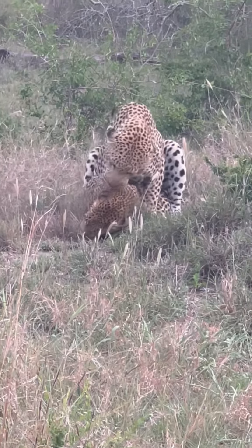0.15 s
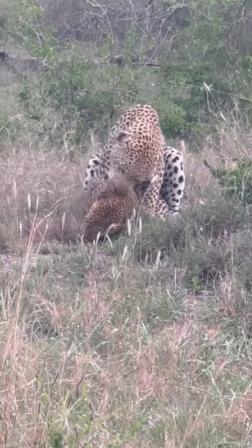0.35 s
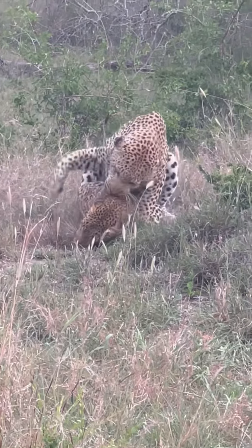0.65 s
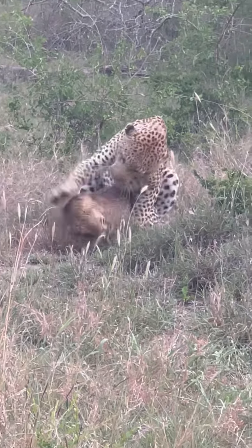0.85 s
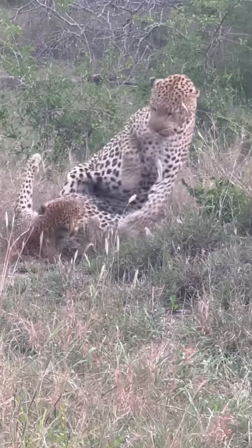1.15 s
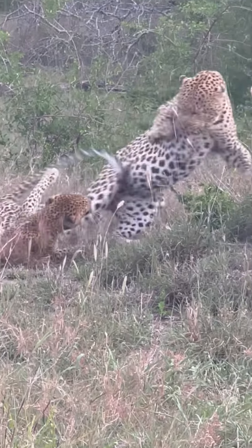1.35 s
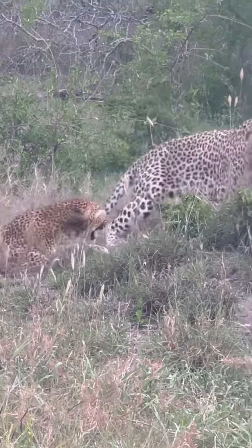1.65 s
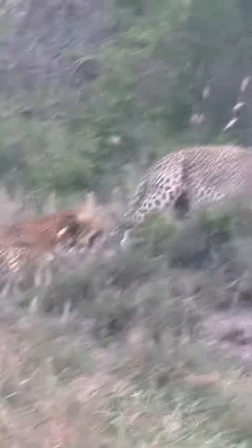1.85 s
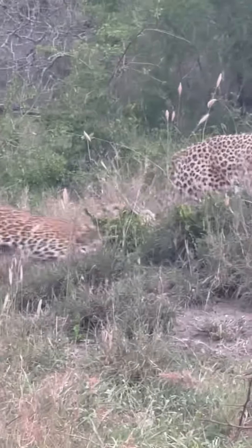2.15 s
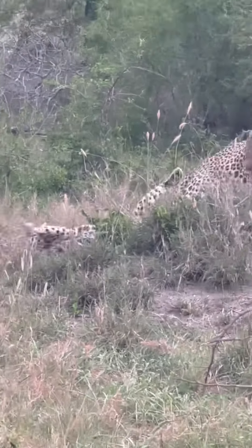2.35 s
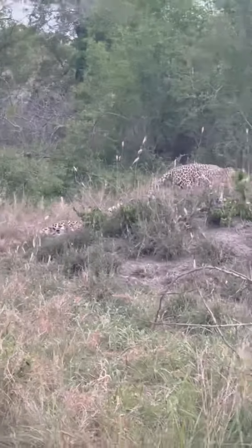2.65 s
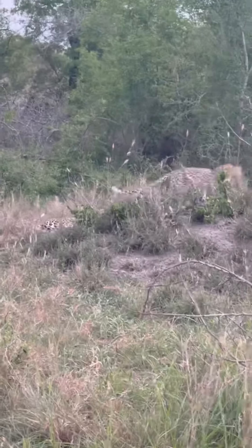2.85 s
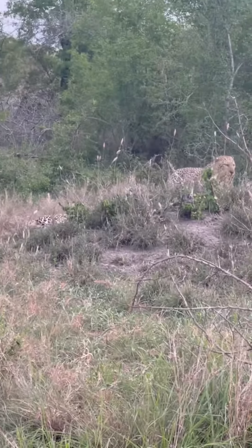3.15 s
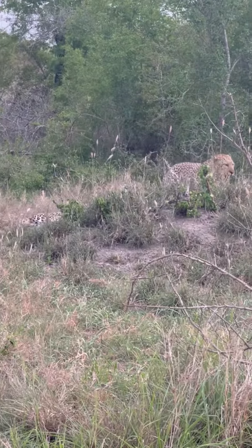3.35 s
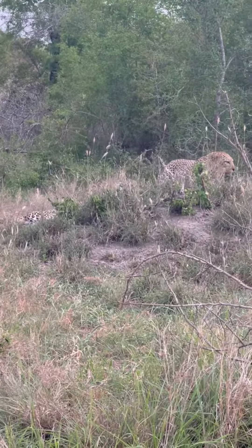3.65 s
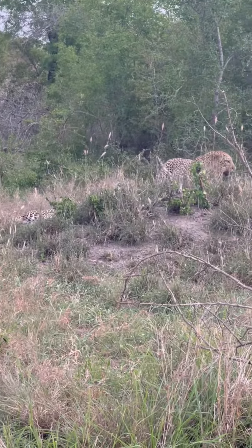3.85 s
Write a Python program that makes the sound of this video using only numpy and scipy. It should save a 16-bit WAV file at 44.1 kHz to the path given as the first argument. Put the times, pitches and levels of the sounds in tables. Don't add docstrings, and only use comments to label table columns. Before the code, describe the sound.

Leopard growls and snarls in rough, rattling bursts, then fades, with dry stems snapping and insects

```python
import sys
import numpy as np
from scipy import signal
from scipy.fft import rfft, irfft
from scipy.io import wavfile
from scipy.ndimage import uniform_filter1d

SR = 44100
rng = np.random.default_rng(int(sys.argv[2]) if len(sys.argv) > 2 else 0)


def boost(x):
    u = np.asarray(x, float) / 20
    return 10 ** u


def generate_wav(signal):
    frames = np.transpose(np.atleast_2d(signal))
    scaled = np.clip(frames, -1, 1) * 32767
    pcm = np.round(scaled).astype(np.int16)
    wavfile.write(sys.argv[1], SR, pcm)


N = 176400

# first flap in seconds, last flap in seconds, level of the first in dB,
# level of the last in dB, slowing of the flaps from -1 to 1.
GROWLS = [(.001, 0.138, -25, -38, 0.055), (0.155, .398, -33, -41, 0.11), (0.421, .446, -30.5, -23.5, 0),
          (0.566, 0.617, -32.5, -23, -0.0015), (0.646, 0.712, -24, -33.5, -0.00084),
          (0.753, 0.786, -30.5, -28, 0), (0.814, 0.82, -23.5, -20, 0), (0.838, 0.88, -23.5, -20.5, 0),
          (0.915, 0.92, -23, -31, 0), (1.013, 1.142, -31.5, -25.5, -0.02),
          (1.166, 1.299, -27, -27.5, 0.025), (1.329, 1.425, -29.5, -47, -0.0994),
          (1.468, 1.598, -34.5, -39, 0.0075), (1.678, 1.803, -28.5, -34, -0.028),
          (1.841, 1.897, -30.5, -34.5, 0), (1.922, 1.973, -32.5, -37.5, -0.0039),
          (2, 2.079, -33.5, -32.5, 0.047), (2.113, 2.2, -31, -52, 0.0011),
          (2.263, 2.475, -35, -40.5, -0.0019), (2.582, 2.658, -38, -38.5, -0.028),
          (2.820, 2.940, -41, -48, -0.0098), (3.466, 3.552, -44.5, -43, 0)]
BREATHINESS = (.2, .3, .55, .35, .15, .15, .1, .15, .45, .3, .42, .5, .7, .5, .5, .4, .25, .35, .8, .35,
               .75, .85)


def evened(x):
    return x / np.sqrt(np.mean(x ** 2) + 1e-20)


def read(points, hz):
    f, value = np.transpose(points)
    return np.interp(np.log(hz + 1), np.log(f + 1), value)


def add(mix, s, sound):
    part = mix[round(max(s, 0) * SR):][:len(sound)]
    part += sound[:len(part)]


def resonate(x, hz, width):
    turn = np.exp(2j * np.pi * np.cumsum(hz * np.ones(len(x))) / SR)
    r = np.exp(-np.pi * width / SR)
    return 2 * (turn * signal.lfilter([1 - r], [1, -r], x / turn)).real


def steep(x, hz, width):
    return resonate(resonate(x, hz, 1.656 * width), hz, 1.64 * width)


def vocal_folds():
    flap_counts = (12, 8, 2, 3, 3, 2, 1, 3, 2, 6, 6, 5, 5, 5, 3, 3, 4, 4, 8, 3, 5, 4)
    timing_s, swell_db, jitter_db = .0008, 2.5, .9
    slap, softening = 0.64, .48
    flaps, puffs = np.zeros(N), np.zeros(N)
    for (first, last, first_db, last_db, slowing), share, count in zip(GROWLS, BREATHINESS, flap_counts):
        u = np.linspace(0, 1, count)
        loud_luck, slap_luck, time_luck = rng.standard_normal((3, count))
        seconds = first + (u - slowing * u * (1 - u) * 2) * (last - first) + timing_s * time_luck
        at = (seconds * SR).astype(int).clip(0)
        level_db = first_db + (last_db - first_db) * u + swell_db * np.sin(np.pi * u)
        size = boost(level_db + jitter_db * loud_luck)
        flaps[at] += size * (1 - softening * share)
        flaps[at + (320 + 60 * slap_luck).astype(int)] += slap * size
        flaps[at + (680 - 90 * slap_luck).astype(int)] += slap * share * size
        puffs[at] += size
    return flaps, puffs


def breath(puffs, share):
    puff_s, leak = 0.0059, 2.0
    fall = np.exp(-1 / (puff_s * SR))
    dying = signal.lfilter([1], [1, -fall], puffs)
    gate = signal.lfilter([.04], [1, -.96], dying)
    air = rng.standard_normal(N) * np.sqrt(2 * (1 - fall))
    return (gate + leak * share * uniform_filter1d(gate, size=1800)) * air


def growls():
    # chest in Hz, throat in Hz, throat in dB, mouth in Hz, mouth in dB.
    tracts = [(177, 315, -4.5, 708, -13), (120, 163, 7.5, 610, -26), (150, 319, 1.5, 760, -23.5),
              (150, 291, 0.5, 744, -18), (150, 283, -5, 890, -17.5), (152, 290, -3.5, 820, -11.5),
              (158, 300, -3, 980, -11), (170, 316, -5, 1290, -17), (168, 348, -5, 704, -16.5),
              (135, 349, 2.5, 440, -20.5), (145, 353, 0, 545, -19), (108, 325, 8, 820, -23),
              (150, 314, -5.5, 994, -20), (150, 299, 4, 1220, -24), (135, 304, 2.5, 1150, -18),
              (125, 387, 2.5, 1060, -21), (108, 394, 4, 1010, -9), (103.5, 346, 2, 680, -24),
              (130, 346, -5, 730, -23), (102, 255, -16, 470, -25), (110, 186, -8, 590, -23),
              (150, 173, 3.5, 540, -44)]
    # centre in Hz, width in Hz, level in dB.
    upper = [(555, 81, -5), (1714, 160, -8), (2074, 140, -13), (2810, 170, -18.5), (3700, 360, -21.5)]
    rasp_levels = [-23, -31, -24, -20.5, -16, -14, -15.5, -12.5, -21, -18.5, -19.5, -18.5, -21, -20, -19.5,
                   -17, -12, -18, -23, -27, -30, -50]
    belly_levels = [-2, 3.5, -1, 2, -2, 0.5, -5, -9, 0, -1, 0.5, -2, 4, -3, -3, 4, -6, -2.5, -3.5, -5, -3.5,
                    -4.5]
    lag_s, low_noise, mouth_wander = 0.00287, .48, .03
    chest_width, throat_width, mouth_width, belly_width = 74, 42, 100, 60

    hold = [s for a, b, *_ in GROWLS for s in (a + (b - a) / 4, b - (b - a) / 4)]
    t = np.arange(N) / SR

    def glide(values):
        return np.interp(t, hold, np.repeat(values, 2))

    chest_hz, throat_hz, throat_db, mouth_hz, mouth_db = (glide(c) for c in np.transpose(tracts))
    share, rasp_db, belly_db = glide(BREATHINESS), glide(rasp_levels), glide(belly_levels)
    unsteady = evened(uniform_filter1d(rng.standard_normal(N), size=1000))
    mouth_hz = mouth_hz * (1 + mouth_wander * unsteady)

    flaps, puffs = vocal_folds()
    air = breath(puffs, share)
    drive = np.roll(flaps, int(lag_s * SR)) + low_noise * share * air
    rasp = 2.02 * share * air + uniform_filter1d(flaps, size=6)

    low = steep(drive, chest_hz, chest_width)
    low += boost(belly_db) * steep(drive, 90.3, belly_width)
    low -= boost(throat_db) * steep(drive, throat_hz, throat_width)
    high = boost(mouth_db) * steep(rasp, mouth_hz, mouth_width)
    for hz, width, db in upper:
        high += boost(db + rasp_db) * steep(rasp, hz, width)
    return boost(46) * (low + high)


def spit(start, length, db, hz, width):
    t = np.arange(int(.25 * SR)) / SR
    air, flutter = rng.standard_normal((2, len(t)))
    flutter_db = 5 * np.tanh(evened(uniform_filter1d(flutter, size=200)))
    shape = np.sin(np.pi * np.clip(t / length, 0, 1)) ** .5 * boost(flutter_db)
    return start, boost(db) * evened(steep(air, hz, width)) * shape


def thump(start, db, hz):
    cycles = 1.46
    turns = np.arange(2500) / SR * hz
    push = np.sin(np.pi * np.clip(turns / cycles, 0, 1))
    return start, boost(db) * np.sin(2 * np.pi * turns) * push


def snap(start, db, hz):
    decay_s, ring_q = .004, 9
    t = np.arange(1500) / SR
    burst = rng.standard_normal(len(t)) * np.exp(-t / decay_s) * np.minimum(t * 2000, 1)
    crack = steep(burst, hz, hz / ring_q)
    return start, boost(db) * crack / abs(crack).max()


def scatter(x, t60, size):
    sparse = rng.choice([-1., 1.], size) * (rng.random(size) < .05)
    taps = sparse * boost(-60 * np.arange(size) / SR / t60)
    return signal.fftconvolve(x, taps / np.linalg.norm(taps))[:N]


def cats():
    # start in seconds, length in seconds, level in dB, centre in Hz, width in Hz.
    spits = [(0, 0.039, -60, 3680, 90), (0.389, 0.023, -58, 3700, 495), (0.411, 0.045, -52.5, 2300, 350),
             (1.063, 0.06, -49, 1700, 500), (1.186, 0.14, -46.5, 1580, 221), (1.231, 0.075, -53, 2350, 260),
             (1.235, .05, -60, 5200, 1200), (.44, .055, -56, 3460, 900), (1.485, 0.068, -59, 3700, 903),
             (.88, 0.059, -59, 3150, 900), (1.317, 0.1, -56, 1750, 600), (1.354, 0.0334, -49.5, 930, 200),
             (1.477, 0.073, -46, 1990, 200), (1.683, 0.21, -54, 1900, 503), (1.79, .15, -53, 850, 90)]
    # start in seconds, peak in dB, ring in Hz.
    snaps = [(.152, -46, 2950), (.389, -43, 3860), (.4439, -39, 3700), (.4623, -41.5, 3700),
             (.472, -39.5, 2000), (.489, -41, 2870), (0.68, -40, 2420), (0.751, -40.5, 2310),
             (.8574, -31, 1760), (.8889, -45, 3650), (.9143, -37, 2900), (.924, -40.5, 2290),
             (0.973, -33.5, 1760), (1.036, -44, 2600), (1.0849, -43, 2500), (1.1134, -46, 3810),
             (1.1408, -37, 2100), (1.187, -38, 1580), (1.2186, -47, 2800), (1.2461, -42, 3520),
             (1.292, -33, 2200), (1.299, -34, 1840), (1.335, -49, 4520), (1.5015, -53, 3470),
             (1.5299, -48, 3980), (1.629, -41.5, 2270), (1.748, -29.5, 1840), (1.772, -38.5, 1256),
             (1.84, -48, 4200), (1.8682, -45.5, 4180), (1.9734, -47.5, 3620), (1.974, -47, 5600),
             (2.0527, -47, 2570), (2.0787, -50, 3700), (3.596, -41.5, 1360)]
    # start in seconds, peak in
    # dB, pitch in Hz.
    thumps = [
        (.466, -23.5, 103),
        (0.477, -18, 118),
        (1.524, -22, 150),
        (1.542, -20, 150),
        (1.549, -21, 150),
        (1.571, -27.5, 191),
        (2.19, -34.5, 188),
        (2.624, -27, 94),
    ]
    sound = growls()
    for play, rows in ((spit, spits), (snap, snaps), (thump, thumps)):
        for row in rows:
            add(sound, *play(*row))
    return sound + boost(-10.5) * scatter(sound, t60=0.44, size=12000)


def cricket(hz, width, db, rate):
    slide_hz, fuzz_share, chirp_depth = 75, .2, .7
    turns = np.cumsum(rate * np.ones(N)) / SR + rng.random()
    drift = evened(uniform_filter1d(rng.standard_normal(N), size=900))
    pitch = hz - slide_hz * np.sin(2 * np.pi * turns) + width * drift
    fuzz = evened(steep(rng.standard_normal(N), pitch, width))
    whistle = np.sin(2 * np.pi * np.cumsum(pitch) / SR) + fuzz_share * fuzz
    return boost(db) * evened(whistle * (1 + chirp_depth * np.cos(2 * np.pi * turns)))


def crickets():
    # time in seconds, rate in chirps per second, level in dB.
    near = [(0, 49, -68), (.5, 42.5, -81), (1.2, 41, -69), (1.9, 42, -66), (2.6, 43, -62), (3.2, 46, -63),
            (4, 44, -63.5)]
    # pitch in Hz, width in Hz, dB at start, dB at end, chirps per second.
    far = [(8450, 25, -78, -64, 43), (9710, 40, -78, -70, 42)]
    t = np.arange(N) / SR
    s, rate, db = np.transpose(near)
    sound = cricket(7490, 25, np.interp(t, s, db), np.interp(t, s, rate))
    for hz, width, start_db, end_db, chirps in far:
        sound += cricket(hz, width, start_db + (end_db - start_db) * t / t[-1], chirps)
    return sound


def bed(shape, db, patchy_db):
    hz = np.fft.rfftfreq(1024, 1 / SR)
    a, b, patches = rng.standard_normal((N // 256 + 5, 513, 3)).T
    patches = uniform_filter1d(uniform_filter1d(patches, size=8, axis=0), size=12, axis=1)
    inside = (hz >= shape[0][0]) & (hz <= shape[-1][0])
    colour = boost(read(shape, hz)[:, None] + patchy_db * evened(patches)) * inside[:, None]
    noise = signal.istft((a + 1j * b) * colour, nperseg=1024, noverlap=768)[1][:N]
    return boost(db) * evened(noise)


def bush():
    # frequency in Hz, level in dB per Hz.
    hum = [(15, -43), (25, 4.5), (75, 6.5), (159, -6), (192, 5), (278, -14.5), (714, -8.5), (888, -18.5),
           (1400, -13), (1820, -55), (3080, -120)]
    # frequency in Hz, level in dB per Hz.
    air = [(820, -11), (1400, -5), (1970, -2), (2450, -7), (3820, -15), (4370, -12.5), (7000, -16),
           (9100, -47), (15400, -120)]
    # frequency in Hz, level in dB per Hz.
    chorus = [(6800, -14), (7300, -4.5), (8200, -4), (9900, -8.5), (11300, -18.5), (12200, -21.5),
              (15700, -23.5)]
    return bed(hum, -47, patchy_db=2.0) + bed(air, -56, patchy_db=1.56) + bed(chorus, -60, patchy_db=0.7)


def scene():
    mix = cats() + crickets() + bush()
    return np.array([mix, mix])


def wide_stereo(mid):
    # frequency in Hz, left minus right in dB.
    balance = [(92, 0), (210, 1.5), (330, 2.5), (500, 5.5), (770, 6.8), (1170, 2.5), (1500, -2), (1760, 0)]
    # frequency in Hz, level in dB.
    loose = [(60, -50), (140, -29), (330, -16.5), (600, -15), (1200, -4), (1700, -19), (5300, -6.5),
             (15000, -3)]
    mono_from, mono_to, loose_share = 1760, 5180, .9
    hz = np.fft.rfftfreq(N, 1 / SR)
    ratio = boost(read(balance, hz) * (hz < mono_from))
    late = loose_share * rfft(scatter(mid, t60=.15, size=5000)) - 1j * rfft(mid)
    side = rfft(mid) * (ratio - 1) / (ratio + 1) + late * boost(read(loose, hz))
    side = irfft(side * ((hz < mono_from) | (hz > mono_to)), N)
    return np.array([mid + side, mid - side])


def patchy_top(x):
    gate_hz, threshold, shut_db = 11500, .15, -40
    hz, t, z = signal.stft(x, SR, nperseg=2048)
    luck = uniform_filter1d(rng.standard_normal((len(t), 96)), size=2, axis=0)
    luck = luck + 0.38 * uniform_filter1d(rng.standard_normal((len(t), 1)), size=3, axis=0)
    shut = np.repeat(luck.T < threshold, 12, axis=0)[:len(hz)] & (hz > gate_hz)[:, None]
    return signal.istft(z * boost(shut_db * shut), SR, nperseg=2048)[1][:, :N]


def top_cut(x):
    return signal.sosfilt(signal.butter(12, 15730, fs=SR, output="sos"), x)


def record(dry):
    bass_cut = signal.butter(3, 52, "high", fs=SR, output="sos")
    mid = signal.sosfilt(bass_cut, dry.mean(0))
    mid = mid - .65 * resonate(mid, 1410, 160)
    power_db = 10 * np.log10(abs(uniform_filter1d(mid ** 2, size=12000)) + 1e-12)
    gain = 1 / boost(0.017 * (power_db - 12.5))
    return top_cut(patchy_top(wide_stereo(mid) * gain))


dry = scene()
out = record(dry)
generate_wav(out)
```